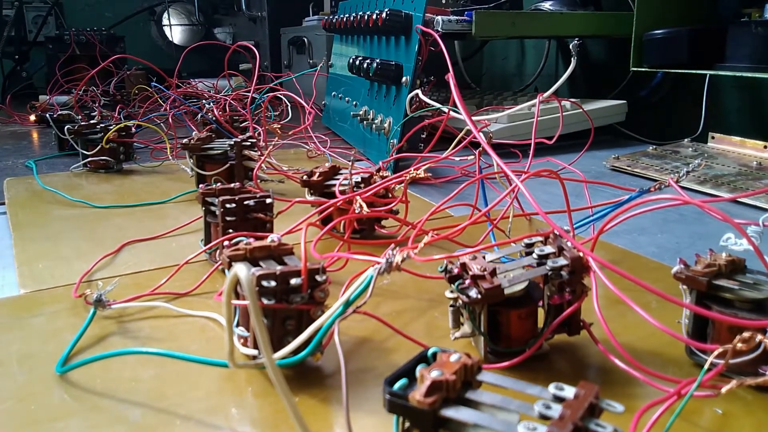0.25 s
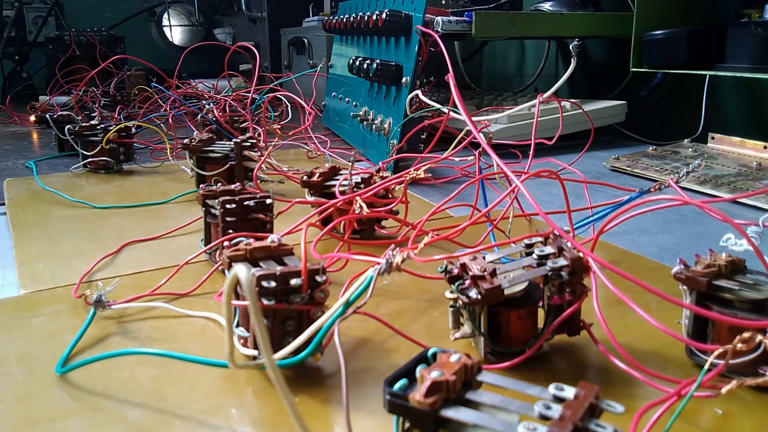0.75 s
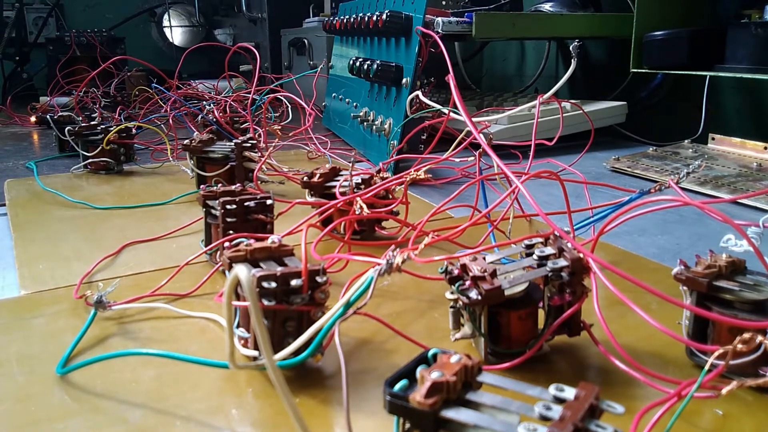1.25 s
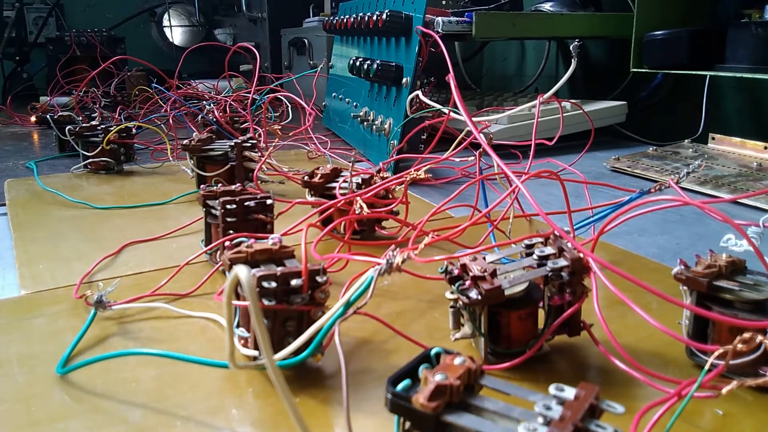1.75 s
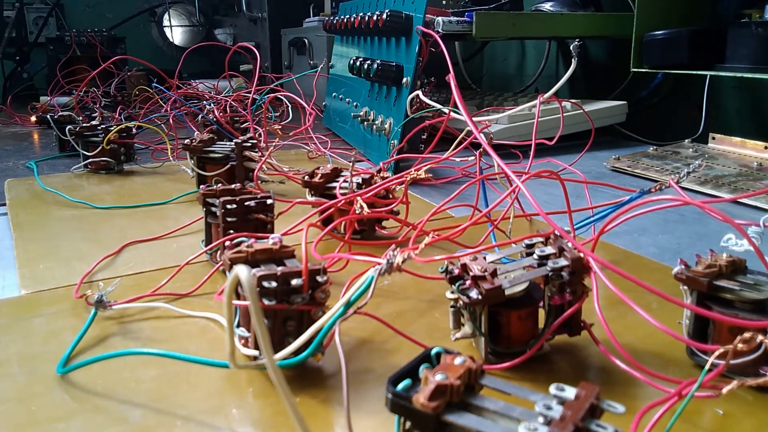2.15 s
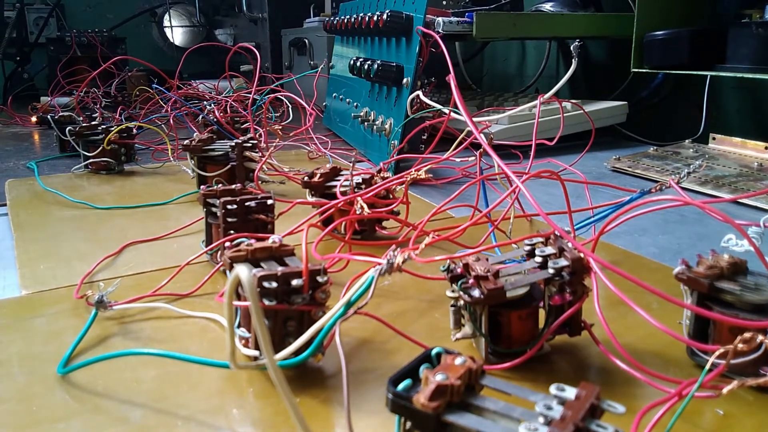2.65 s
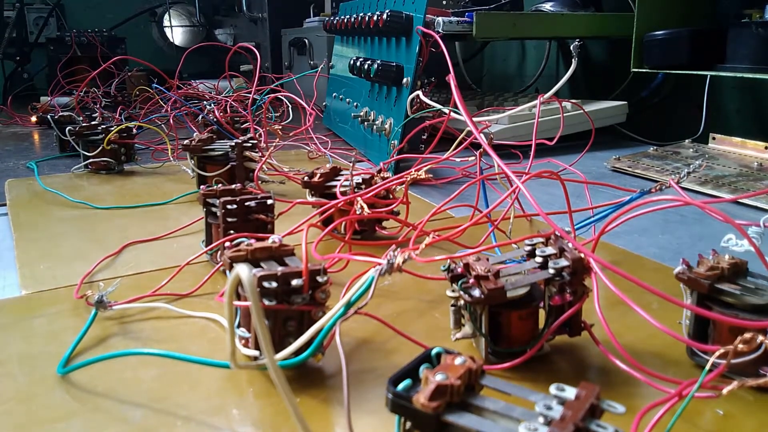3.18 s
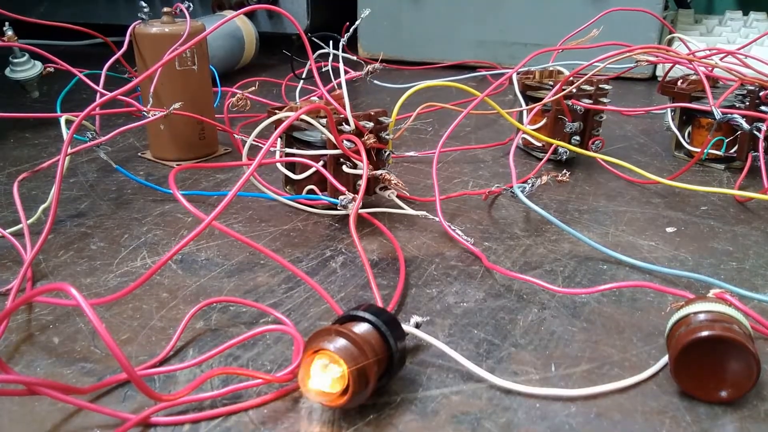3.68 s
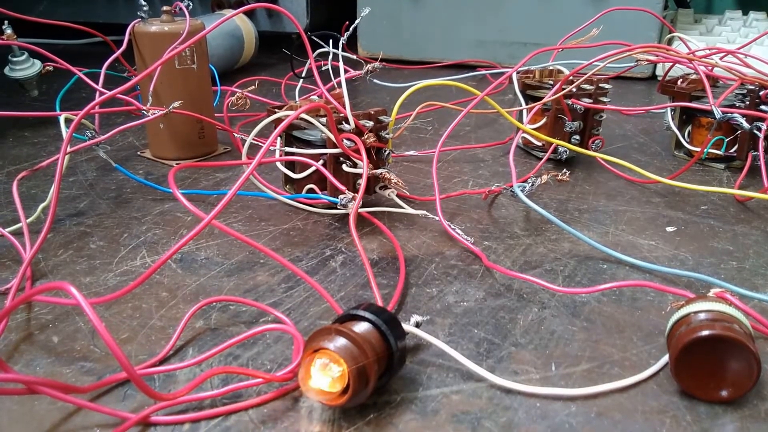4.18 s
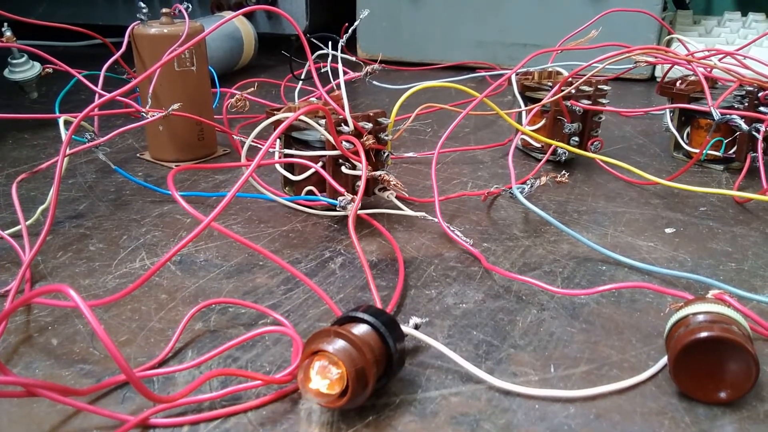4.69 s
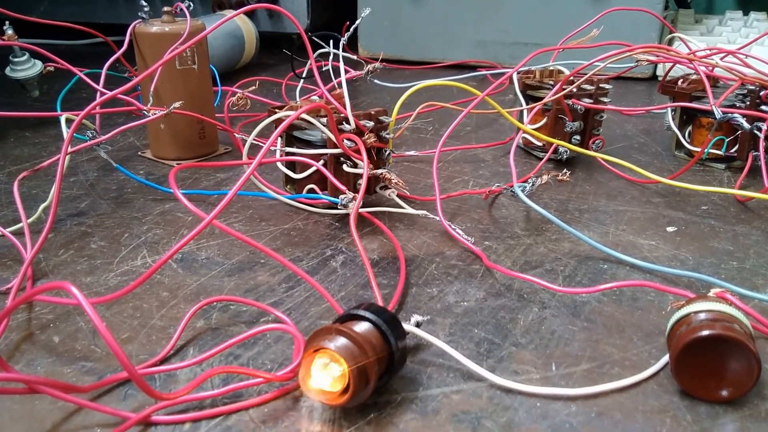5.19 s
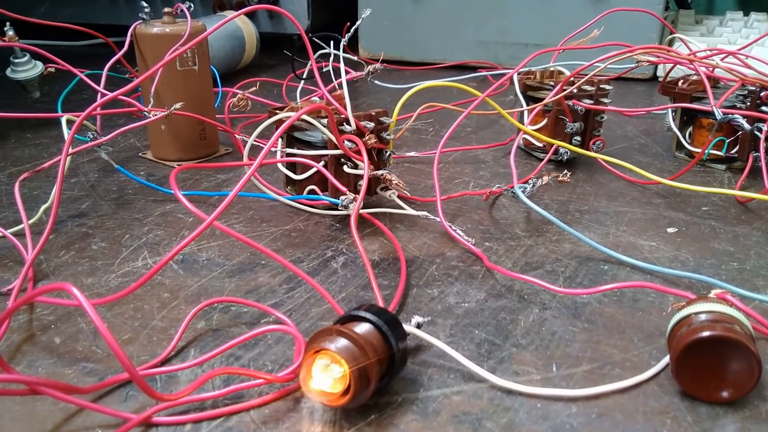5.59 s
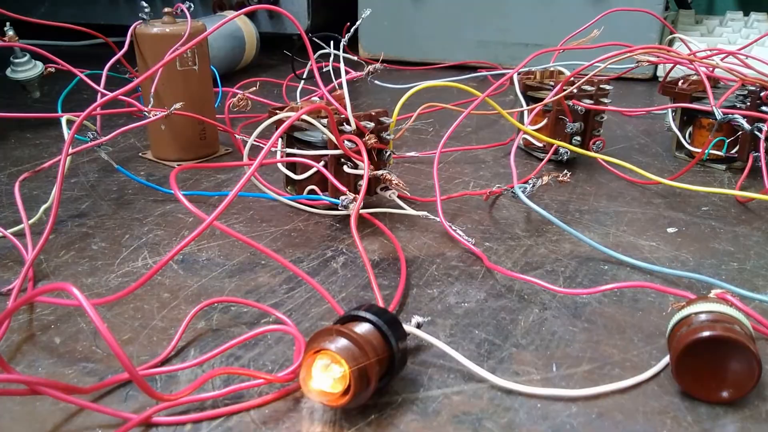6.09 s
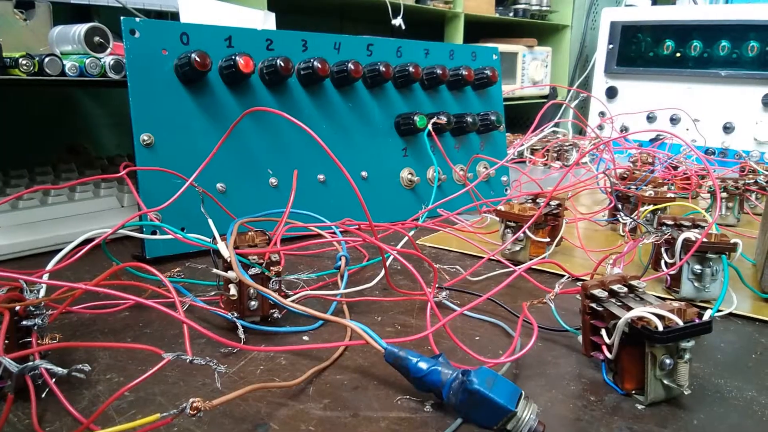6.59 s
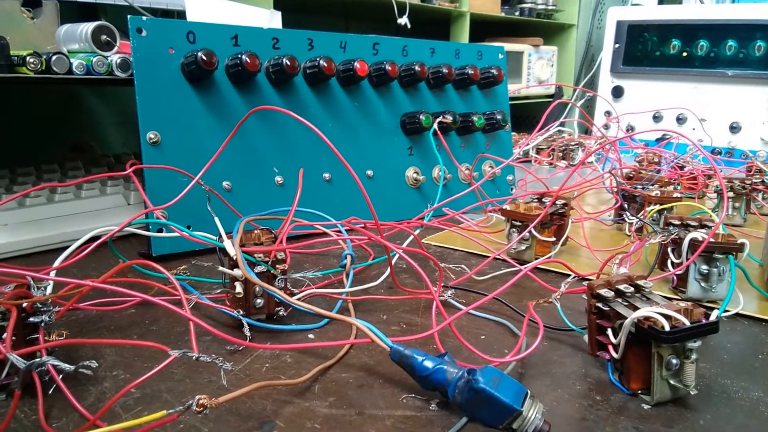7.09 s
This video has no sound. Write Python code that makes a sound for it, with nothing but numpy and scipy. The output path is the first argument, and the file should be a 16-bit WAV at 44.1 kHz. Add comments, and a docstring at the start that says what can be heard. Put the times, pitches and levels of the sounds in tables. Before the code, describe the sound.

Close to a workbench in a small hard room, electromechanical relays step slowly: a crisp snap, then a heavier double clack and slam, with bright springy ringing. After about three seconds it cuts to one small relay, much quieter, ticking evenly at over seven beats a second with soft release ticks. At just over six seconds, loud counter relays race in a dense, ringing clatter until the end.

```python
"""Relay logic on a workbench

In three parts, a home-built counter steps slowly, one relay blinks a lamp, then the counter races.
Each blow rings springs, armature, frame and bench: a short crack plus fading resonances, with chatter.
Armatures scrape and contacts rasp as shaped noise; a small hard room adds a fading noise tail.
Faint hiss, a wavering drone, a lumpy low wash and a deep rumble lie underneath.
"""
import sys
import numpy as np
from scipy import signal
from scipy.fft import rfft, irfft
from scipy.io import wavfile
from scipy.ndimage import uniform_filter1d

SR = 44100
rng = np.random.default_rng(int(sys.argv[2]) if len(sys.argv) > 2 else 0)


def generate_wav(signal):
    """Clip the signal to [-1, 1] and save it as 16-bit WAV at the path in sys.argv[1]."""
    frames = np.transpose(np.atleast_2d(signal))
    scaled = np.clip(frames, -1, 1) * 32767
    pcm = np.round(scaled).astype(np.int16)
    wavfile.write(sys.argv[1], SR, pcm)


N = 323694  # length in samples

# When the first part ends, the second ends and the third starts: time_s
PART_TIMES_S = (3.247, 6.213, 6.257)

# Counter: a relay pulls in. Columns: slam_s, slam_db, then clink_db, knock_db, thump_db (relative to
# the slam), contact_lead_s (before the slam), contact_db, swing_db
PULL_INS = [(.6333, -2.5, -8, -8, -36.5, .0222, -7, -27.5),
            (1.3106, -3, -31, -11.5, -33.5, 0.025, -6.5, -24.5),
            (1.9827, -4, -1.5, -6.5, -28.5, 0.021, -8, -26.5),
            (2.6717, -3, -29, -10, -27, 0.009, -7.5, -24),
            (6.4183, -11.5, -9, -8.5, -26, 0.015, -5.5, -26.5), (6.68, -0.5, -5, -8, -27, .0172, -1, -24),
            (6.9563, -3, -16, -4, -24.5, 0.017, -10, -22),
            (7.232, -3.5, -4, -5.5, -79, 0.026, -10.5, -24.5)]
# Counter: a relay drops out. Columns: snap_s, snap_db, then clink_db, knock_db (relative to the snap),
# parting_lead_s (before the snap)
DROP_OUTS = [(0.2755, 0.5, -10, -14, 0.0085), (.9502, -1, -8.5, -15, 0.014), (1.6228, -0.5, -9, -16, 0.009),
             (2.3087, -3, -9, -17.5, 0.01), (2.9852, -0.5, -11, -13, .015),
             (6.5297, 1.5, -16, -19.5, 0.012), (6.8014, 0.5, -11, -17.5, 0.017),
             (7.0741, 1.5, -16, -16.5, .0134), (7.3477, -4.5, -16, -18, 0.013)]
# A neighbouring relay trips once. Columns: start_s, click_db, then clink_db, thump_db (relative to the click)
TRIPS = [(0.6257, -5, -8, -24.5), (1.0079, -19.5, -10, -26), (1.3005, -0.5, -12, -30.5),
         (2.0788, -14.5, -17, -22.5), (2.3583, -22.5, -5, -25), (2.4224, -26.5, -25, -35),
         (2.6992, -0.5, -6.5, -46), (6.225, -8.5, -16, -49), (6.4289, -6.5, -16, -24.5),
         (6.5748, -12, -12, -20), (6.6902, -4.5, -27, -24), (6.8516, -7.5, -8.5, -26.5),
         (6.9626, 3.5, -19, -30.5), (7.122, -13, -12, -23), (7.2417, -2.5, -28, -69),
         (7.2943, -12, -26, -54)]
# A farther relay answers with a double clack. Columns: start_s, level_db, gap_s
ANSWERS = [(.032, -9.5, 0.012), (.703, -11.5, 0.016), (1.3776, -12.5, 0.016), (2.0527, -9, .0123),
           (2.7377, -10.5, 0.016)]
# A short, soft burst of grainy noise at the start, like the fading tail of a clatter.
# Columns: time_s (the burst begins SWING_LEAD_S earlier), level_db
OPENING_BURST = [(.036, -31.5)]

# How a blow shares its force. Columns: click_db, clink_db, knock_db, thump_db
CONTACT_MIX = (0.5, -15.5, -14, -36)
# The same columns; rows are the first and second clack
ANSWER_MIX = [(0, -15, -16, -24.5), (-2, -15.5, -21.5, -25.5)]
# The same columns; rows are the first touch and the contacts parting
SLOW_DROP_MIX = [(-28.5, -51, -55.5, -75.5), (-22, -35, -38.5, -57)]
FAST_DROP_MIX = [(-16, -35, -35, -36.5), (-2.5, -19.5, -36, -30)]
# Light blows while an armature travels. Columns: lead_s (before the slam), then click_db, clink_db,
# knock_db, thump_db (relative to the swing)
SWING_BLOWS = [(.0405, 6.9, -1, -8.5, -16.5), (.031, 0, -5.5, -3.5, -15.5)]

# Blinker: blows of one closing. Columns: lag_s (after the main blow), spring_db, armature_db
BLINK_CYCLE = [(-.003, -29, -16.5), (0, 0.5, -20.5), (.0053, -9.5, -29), (0.0172, -17, -43)]
# Blinker: blows as it lets go. Columns: lag_s (after the main blow), spring_db, backstop_db
RELEASE = [(.091, -50, -28), (.094, -23.5, -21.5), (.107, -89, -27)]
# Blinks that close harder. Columns: start_s, extra_db
HARD_BLINKS = [(5.659, 3), (6.2, 2.5)]

# Resonances of the counter's springs, slow then fast, before small pitch shifts.
# Columns: pitch_hz, width_hz, level_db (relative)
SLOW_SPRING_MODES = [(5265, 190, 8), (5640, 150, 5.5), (7130, 230, -8.5), (7110, 110, 5.5), (7020, 110, -4),
                     (7300, 72, -3.5), (7935, 55, 0.5), (10500, 46, -9.5), (13200, 110, -28)]
FAST_SPRING_MODES = [(5130, 120, 12), (5500, 91, 10), (5680, 49, 8.5), (6100, 370, 0), (7200, 55, -12),
                     (7600, 90, -22), (7600, 93, 5), (9900, 87, -25)]
# Resonances of the counter's armatures, frames, bench and yokes. Columns: pitch_hz, width_hz, level_db (relative)
CLINK_MODES = [(2845, 56, 2.5), (3343, 89, -4.5), (4200, 210, -3.5), (4150, 41, -3), (4770, 170, 3)]
FRAME_MODES = [(910, 52, 12.5), (1400, 63, -16), (1883, 97, -3.5), (1986, 22, 14), (2317, 120, 19),
               (2980, 72, 15.5)]
BENCH_MODES = [(134, 48, 0), (177.4, 31, 4.5), (231.3, 38, -7.5), (335, 27, -5)]
YOKE_MODES = [(1950, 95, 0), (2260, 120, 2), (2830, 63, -2)]
# Resonances of the blinker's spring, armature and back stop. Columns: pitch_hz, width_hz, level_db (relative)
BLINK_SPRING_MODES = [(4460, 386, -15), (5390, 160, -13.5), (6050, 78, -1.5), (6370, 364, -1),
                      (6837, 271, -1.5), (7580, 150, -14), (9030, 76, -13.5), (13800, 130, -36)]
BLINK_ARMATURE_MODES = [(4290, 295, -3.5), (4595, 178, 3), (4780, 225, -2)]
BACKSTOP_MODES = [(2820, 810, -12), (3630, 207, 4), (4200, 370, -6)]

# Colour of the bare impacts. Columns: pitch_hz, level_db (relative)
SPRING_CRACK = [(1000, -41.5), (2500, -36), (4200, -12), (5500, 2.5), (7500, 2.5), (9000, -4.5),
                (11000, -10.5), (14000, -15.5)]
CLINK_CRACK = [(1000, -34), (2500, -6), (3500, 1), (4600, 1.5), (6000, -16.5), (14000, -31)]
FRAME_CRACK = [(150, -29.5), (400, -17), (700, -15), (1200, 2.5), (2100, 6), (3000, 1), (4500, 6.5),
               (8000, -35.5)]
BENCH_CRACK = [(30, -35), (70, -8), (200, -3.5), (450, -8.5), (900, -11), (2500, -65)]
BLINK_CRACK = [(1000, -46), (2700, -15), (3800, 7.5), (6500, 0), (9000, 5), (11000, -1), (14000, 2)]
# Colour of the grainy scrape and of the contacts' rasp. Columns: pitch_hz, level_db (relative)
SCRAPE_COLOUR = [(300, -38.0), (900, -20.5), (1600, -12.5), (2300, 12), (3200, -2.5), (4500, 0),
                 (8000, -5.0), (14000, -14.5)]
WIPE_COLOUR = [(500, -24.5), (2000, -18.5), (4000, -13.5), (7300, 6), (10000, -1.5), (14000, -12)]

# The room's tail in each part. Columns: pitch_hz, level_db (relative), t60_s (time to fade by 60 dB)
SLOW_ROOM = [(152.3, -4, 0.067), (500, -7.5, 0.05), (1125, -7, 0.32), (2510, -11.5, 0.31), (4590, -9, 0.36),
             (7360, -7.5, 0.49), (14000, -11.5, .46)]
BLINK_ROOM = [(490, 7.5, 1), (2824, -4, 0.15), (4170, -22, 0.3), (5510, -2, 0.23), (6930, -10.5, 0.28),
              (8450, 2, 0.22), (14000, -9, 0.29)]
FAST_ROOM = [(150, -9.5, 0.91), (490, 3, 0.28), (1110, -8, 0.36), (2460, -11, 0.42), (4500, -7.5, 0.41),
             (7240, -4.5, 0.34), (14200, -10, 0.52)]

# Colour of the background noise in each part. Columns: pitch_hz, level_db (relative)
SLOW_AIR = [(25, -24.5), (60, -1.5), (100, -6), (250, -6), (500, -10), (900, -20), (2000, -21), (6000, -35),
            (14000, -46.5)]
BLINK_AIR = [(25, -22), (60, 8.5), (150, -2.5), (500, -4.5), (1000, -13.5), (2000, -12.5), (4000, -18),
             (7000, -42), (14000, -44)]
FAST_AIR = [(25, -22), (65, -10), (200, -4), (400, -8), (700, -12), (1800, -13.5), (3700, -8.5),
            (6000, -0.5), (14000, -25)]
# Colour of the drone's noise and of the rumble. Columns: pitch_hz, level_db (relative)
DRONE_COLOUR = [(150, -43), (330, -16), (390, -6.5), (417, -6.5), (445, -9.5), (520, -21.5), (800, -37.5),
                (3000, -55.5)]
RUMBLE_COLOUR = [(20, -39.5), (42, -19.5), (60, -5.5), (85, -11.0), (140, -26.5), (600, -55.5)]
# Bands of the low wash. Columns: pitch_hz, level_db (before flicker and swells)
WASH_BANDS = [(220, -6), (310, -9), (450, -7.5), (580, -16), (810, -13.5)]
# Rise and fall of the fast count's hiss, the drone, the low wash and the rumble. Columns: time_s, gain_db
FAST_HISS = [(6.26, -42), (6.6, -33), (7.34, -54)]
DRONE = [(0, -46), (.14, -72.5), (.44, -48), (.54, -66.5), (.61, -47), (.71, -36.5), (.83, -56),
         (.93, -41.5), (1.04, -59), (1.8, -56), (1.89, -36.5), (2.0, -52.5), (2.55, -80), (2.75, -48.5),
         (3.24, -59.5)]
WASH = [(3.25, -56.5), (3.6, -64.5), (3.95, -54), (4.25, -60.5), (4.68, -66), (4.9, -54), (5.5, -65.5),
        (6.07, -67.5), (6.15, -53.5)]
RUMBLE = [(0, -36), (.08, -81), (3.25, -79.5), (3.48, -58.5), (3.8, -71), (5.3, -66.5), (5.58, -54),
          (5.77, -56), (6.0, -68.5), (6.27, -74), (6.34, -47), (6.9, -41), (7.34, -63)]

TOUCH_LEAD_S = 0.015  # first touch, before the contacts part
REBOUND_S, REBOUND_DB = .0033, -6.5  # after the snap; relative to it
TRIP_KNOCK_DB = -21  # relative to the click
SWING_LEAD_S, SWING_S = .049, 0.052  # scrape starts this long before its table time; its length
YOKE_LEAD_S, YOKE_DB = .031, 2.5  # before the slam; relative to the swing
WIPE_LEAD_S, WIPE_DB = 0.025, -24.5  # rasp starts before the snap; relative to the snap
BLINK_START_S, BLINK_PERIOD_S = 3.2274, .13511
BLINK_DB, BLINK_SCATTER_DB, RELEASE_SCATTER_DB = -17, .4, 1.8  # before the cut in blinker()
BLINK_CHATTER_DB = -9  # relative to the first contact
WASH_FLICKER_DB = 4.5
TONE_HZ = 417  # centre of the unsteady tone
PEAK, TOP_HZ = .9, 14300  # rounding ceiling and upper pitch limit


def slow_count():
    """Heavy pull-ins alternate with the clean snap of a near relay letting go."""
    ins, outs, trips = (between(rows, 0, PART_TIMES_S[0]) for rows in (PULL_INS, DROP_OUTS, TRIPS))
    drops = counter(drop_out(outs, SLOW_DROP_MIX, thump_db=-48.5), SLOW_SPRING_MODES, ring_db=-2,
                    click_db=-4, clink_db=-1.5, knock_db=-5, thump_db=5.0,
                    chatter_s=0.0033, chatter_db=4.0, rattle_s=0.003, detune=.012)
    pulls = counter(pull_in(ins) + trip(trips) + answer(ANSWERS), SLOW_SPRING_MODES, ring_db=-3.5,
                    click_db=-6.5, clink_db=0, knock_db=-2, thump_db=-3.5,
                    chatter_s=0.0035, chatter_db=9.5, rattle_s=0.0093, detune=0.048)
    pulls = pulls + scrapes(ins + list(OPENING_BURST)) + yoke_rings(ins)
    relays = room(drops + wipes(outs), SLOW_ROOM, wet_db=0.5) + room(pulls, SLOW_ROOM, wet_db=1.5)
    return expander(relays + air(SLOW_AIR, -56.5), threshold_db=-50) + drone()


def fast_count():
    """The counter races, each clatter falling into the echo of the last; it is running from the outset."""
    ins, outs, trips = (between(rows, PART_TIMES_S[1], np.inf) for rows in (PULL_INS, DROP_OUTS, TRIPS))
    blows = pull_in(ins) + drop_out(outs, FAST_DROP_MIX, thump_db=-36.5) + trip(trips)
    relays = counter(blows, FAST_SPRING_MODES, ring_db=-6.5,
                     click_db=-6.5, clink_db=-0.5, knock_db=-1, thump_db=-1.5,
                     chatter_s=0.0021, chatter_db=5.0, rattle_s=0.0049, detune=0.033)
    hiss = air(FAST_AIR, 0) * undb(curve(FAST_HISS))
    return room(relays + scrapes(ins) + yoke_rings(ins), FAST_ROOM, wet_db=-1.0) + hiss


def counter(blows, modes, ring_db, click_db, clink_db, knock_db, thump_db,
            chatter_s, chatter_db, rattle_s, detune):
    """Each blow clicks the contact springs, clinks the armature, knocks the frame and thumps the bench."""
    frame = body(FRAME_MODES, FRAME_CRACK, ring_db=-3.5)
    armature = body(CLINK_MODES, CLINK_CRACK, ring_db=-7.0, size=2048)
    bench = body(BENCH_MODES, BENCH_CRACK, ring_db=2.0)
    out = np.zeros(N)
    for s, click, clink, knock, thump in blows:
        # shift each pitch a little, so no two clicks ring quite alike
        own_modes = [(hz * (1 + detune * rng.standard_normal()), width, db) for hz, width, db in modes]
        spring = body(own_modes, SPRING_CRACK, ring_db, size=2048)
        add(out, s, undb(click + click_db) * blow(spring, chatter_s, chatter_db))
        add(out, s, undb(clink + clink_db) * blow(armature, chatter_s, chatter_db))
        add(out, s, undb(knock + knock_db) * blow(frame, rattle_s, chatter_db=5.5))
        add(out, s, undb(thump + thump_db) * blow(bench, chatter_s=0.014, chatter_db=1.5))
    return out


def pull_in(rows):
    """The armature knocks lightly as it travels, closes the contacts, then slams onto the core."""
    blows = []
    for s, db, clink, knock, thump, lead, contact_db, swing_db in rows:
        for early, *mix in SWING_BLOWS:
            blows.append((s - early, *(swing_db + np.array(mix))))
        blows.append((s - lead, *(contact_db + np.array(CONTACT_MIX))))
        blows.append((s, db, db + clink, db + knock, db + thump))
    return blows


def drop_out(rows, mixes, thump_db):
    """A touch, the contacts parting, the snap against the stop, each harder; then one rebound."""
    touch, parting = np.array(mixes)
    blows = []
    for s, db, clink, knock, lead in rows:
        snap = db + np.array([0, clink, knock, thump_db])
        blows.append((s - lead - TOUCH_LEAD_S, *(db + touch)))
        blows.append((s - lead, *(db + parting)))
        blows.append((s, *snap))
        blows.append((s + REBOUND_S, *(snap + REBOUND_DB)))
    return blows


def trip(rows):
    """A neighbouring relay gives one sharp blow that hardly stirs the frame."""
    return [(s, db, db + clink, db + TRIP_KNOCK_DB, db + thump) for s, db, clink, thump in rows]


def answer(rows):
    """A farther relay gives two quick clacks that carry through the bench."""
    return [(s + k * gap, *(db + np.array(mix))) for s, db, gap in rows for k, mix in enumerate(ANSWER_MIX)]


def scrapes(rows):
    """Grainy noise swells and fades in the frame, like the little slips of a travelling armature."""
    slips = np.zeros(N)
    swell = np.hanning(int(SWING_S * SR))
    for s, *_, db in rows:
        grit = rng.laplace(size=8192)[:len(swell)] / np.sqrt(2)
        add(slips, s - SWING_LEAD_S, undb(db) * swell * grit)
    frame = unit(body(FRAME_MODES, SCRAPE_COLOUR, ring_db=-9.0))
    return signal.fftconvolve(slips, frame)[:N]


def yoke_rings(pulls):
    """The coil grabs the armature: a soft push sets the iron yoke ringing before each slam."""
    yoke = body(YOKE_MODES, FRAME_CRACK, ring_db=12, size=2048)
    out = np.zeros(N)
    for s, *_, db in pulls:
        add(out, s - YOKE_LEAD_S, undb(db + YOKE_DB) * blow(yoke, chatter_s=.004, chatter_db=7))
    return out


def wipes(drops):
    """The contacts slide over each other with a thin, growing rasp until the armature snaps back."""
    rasp = np.zeros(N)
    swell = np.linspace(.4, 1, int(WIPE_LEAD_S * SR))
    for s, db, *_ in drops:
        grit = rng.laplace(size=4096)[:len(swell)] / 2
        add(rasp, s - WIPE_LEAD_S, undb(db + WIPE_DB) * swell * grit)
    spring = unit(body(SLOW_SPRING_MODES, WIPE_COLOUR, ring_db=-11.5))
    return signal.fftconvolve(rasp, spring)[:N]


def blinker():
    """One relay at a steady beat: a touch, the snap and its rebounds, then soft, uneven release ticks."""
    spring = body(BLINK_SPRING_MODES, BLINK_CRACK, ring_db=10.5)
    armature = body(BLINK_ARMATURE_MODES, BLINK_CRACK, ring_db=11.5)
    backstop = body(BACKSTOP_MODES, BLINK_CRACK, ring_db=13)
    out = np.zeros(N)
    for s in np.arange(BLINK_START_S, PART_TIMES_S[1], BLINK_PERIOD_S):
        db = BLINK_DB + BLINK_SCATTER_DB * rng.standard_normal()
        db += sum(extra for when, extra in HARD_BLINKS if abs(when - s) < BLINK_PERIOD_S / 2)
        for lag, spring_db, armature_db in BLINK_CYCLE:
            click = blow(spring, chatter_s=0.0049, chatter_db=BLINK_CHATTER_DB)
            add(out, s + lag, undb(db + spring_db) * click)
            add(out, s + lag, undb(db + armature_db) * blow(armature, chatter_s=0.0025, chatter_db=15))
        for lag, spring_db, stop_db in RELEASE:
            force_db = db + RELEASE_SCATTER_DB * rng.standard_normal()
            add(out, s + lag, undb(force_db + spring_db) * blow(spring, chatter_s=0.002, chatter_db=10))
            add(out, s + lag, undb(force_db + stop_db) * blow(backstop, chatter_s=0.0045, chatter_db=-7))
    relay = room(out * undb(-5.5), BLINK_ROOM, wet_db=0.5)
    return expander(relay, threshold_db=-55.5) + low_wash() + air(BLINK_AIR, -64)


def body(modes, crack, ring_db, size=8192):
    """One tap on an object gives an instant crack of a given colour plus fading resonances."""
    # fold the log spectrum's echo onto positive time: the crack then starts at once (minimum phase)
    cepstrum = irfft(np.log(undb(on_bins(*np.transpose(crack), size))))
    cepstrum[1:size // 2] *= 2
    cepstrum[size // 2 + 1:] = 0
    crack_sound = irfft(np.exp(rfft(cepstrum)))
    t = np.arange(size) / SR
    ring = np.zeros(size)
    for k, (hz, width, db) in enumerate(modes):
        fade = np.exp(-np.pi * width * t)  # wider resonances fade sooner
        ring += (-1) ** k * undb(db) * width * fade * np.sin(2 * np.pi * hz * t)
    return unit(crack_sound) + undb(ring_db) * unit(ring)


def blow(response, chatter_s, chatter_db, size=2048, count=88):
    """A first contact and a fading chatter of rebounds ring a body; its loudest 2 ms have level 1."""
    t = np.arange(size) / SR
    # cubing makes a few rebounds stand out
    push = undb(chatter_db) * unit(rng.standard_normal(size) ** 3 * np.exp(-t / chatter_s))
    push[0] += 1
    sound = signal.fftconvolve(push, response)
    return sound / np.sqrt(uniform_filter1d(sound ** 2, count).max())


def room(x, bands, wet_db, size=256, order=64, count=3):
    """Direct sound plus a tail: the room stores energy at each pitch and lets it fade as dense noise."""
    hz, db, t60 = np.transpose(bands)
    frames = dict(nperseg=size, noverlap=size - order)
    power = np.abs(signal.stft(x, **frames)[2]) ** 2
    # share of the energy kept from one frame to the next
    keep = np.exp(-2 * np.log(1000) * order / SR / on_bins(hz, t60, size))
    # the leading zeros delay the tail by a few milliseconds
    stored = np.array([signal.lfilter([0] * count + [1 - k], [1, -k], p + 1e-18)
                       for k, p in zip(keep, power)])
    wash = signal.stft(rng.standard_normal(N), **frames)[2]
    gain = undb(on_bins(hz, db, size) + wet_db)[:, None] / np.std(wash)
    tail = signal.istft(np.sqrt(stored) * gain * wash, **frames)[1][:N]
    return x + tail


def expander(x, threshold_db, size=1100):
    """Noise suppression: whatever sinks under the threshold is pulled further down."""
    over = (uniform_filter1d(x ** 2, size) / undb(threshold_db) ** 2) ** 2
    return x * (over + 0.022) / (over + 1)


def drone():
    """A narrow band of noise around a slightly unsteady tone."""
    noise = air(DRONE_COLOUR, -3.5)
    pitch_hz = TONE_HZ * (1 + 0.00717 * walk(rate_hz=12))
    tone = np.sin(2 * np.pi * np.cumsum(pitch_hz) / SR)
    return (noise + undb(-4) * tone) * undb(curve(DRONE))


def low_wash():
    """Faint low noise swells in uneven lumps; each band flickers by itself."""
    bands = np.zeros(N)
    for hz, db in WASH_BANDS:
        noise = air([(hz / 2, -36), (hz, 0), (hz * 2, -42)], db)
        bands += noise * undb(WASH_FLICKER_DB * walk(rate_hz=16))
    return bands * undb(curve(WASH))


def deep_rumble():
    """Very low noise comes and goes."""
    return air(RUMBLE_COLOUR, 0) * undb(curve(RUMBLE))


def air(spectrum, db):
    """Steady noise of a given colour and average (rms) level."""
    noise = irfft(rfft(rng.standard_normal(N)) * undb(on_bins(*np.transpose(spectrum), N)), N)
    return unit(noise) * np.sqrt(N) * undb(db)


def walk(rate_hz):
    """Slow random wandering with a spread of about 1."""
    steps = rng.standard_normal(512)
    # joining the steps with lines narrows their spread; 1.22 restores it
    return 1.22 * np.interp(np.arange(N) / SR * rate_hz, np.arange(len(steps)), steps)


def curve(rows):
    """Join (time, value) points into one value per sample."""
    return np.interp(np.arange(N) / SR, *np.transpose(rows))


def between(rows, start, end):
    """Pick the events of one part."""
    return [row for row in rows if start <= row[0] < end]


def add(out, s, sound):
    """Mix a sound in at time s, trimming what falls outside."""
    start = max(int(s * SR), 0)
    part = sound[start - int(s * SR):][:max(len(out) - start, 0)]
    out[start:start + len(part)] += part


def on_bins(hz, values, size):
    """Join points on a log-pitch axis and read them at the bins of a transform."""
    return np.interp(np.log(np.fft.rfftfreq(size, 1 / SR) + 1), np.log(hz), values)


def unit(x):
    """Scale to a total energy of 1."""
    return x / np.sqrt(np.sum(x ** 2))


def undb(db):
    """Turn decibels into a gain."""
    return 10 ** (np.asarray(db) / 20)


def scene():
    """Three parts follow each other, with a short silence before the last, over a deep rumble."""
    t = np.arange(N) / SR
    first_end, second_end, third_start = PART_TIMES_S
    rumble = deep_rumble()
    parts = [part() + rumble for part in (slow_count, blinker, fast_count)]
    # the first true condition wins; where none is true there is silence
    spans = [t < first_end, t < second_end, t > third_start]
    return np.select(spans, parts)[None]


def record(dry):
    """Round off the sharpest peaks, then cut the top of the treble."""
    rounded = PEAK * np.tanh(dry / PEAK)
    top_cut = signal.ellip(12, .2, 100, TOP_HZ, fs=SR, output="sos")
    return signal.sosfilt(top_cut, rounded)


dry = scene()
out = record(dry)
generate_wav(out)
```